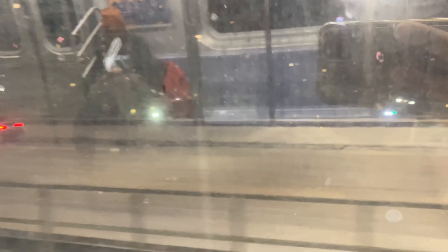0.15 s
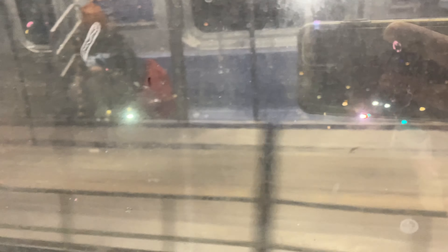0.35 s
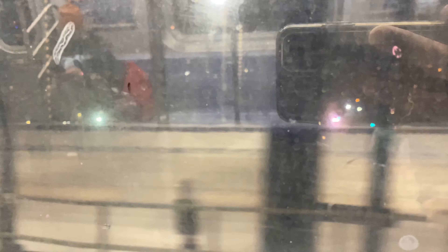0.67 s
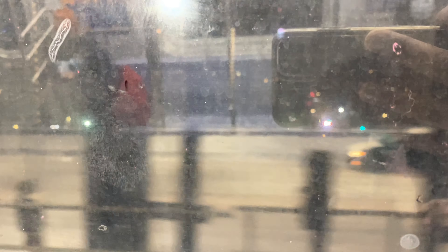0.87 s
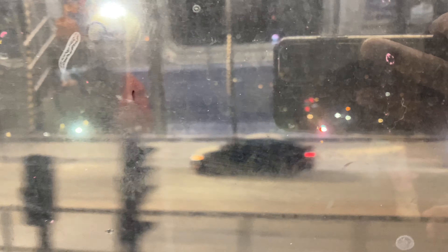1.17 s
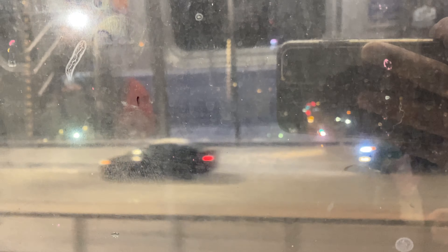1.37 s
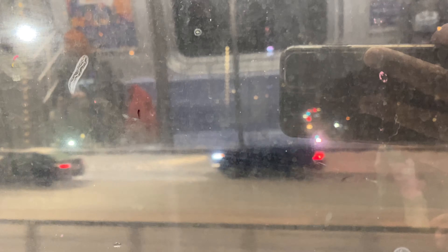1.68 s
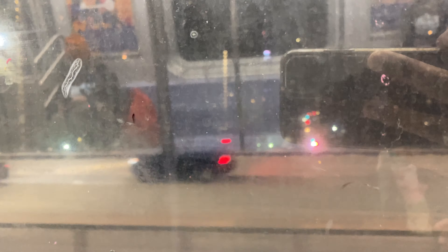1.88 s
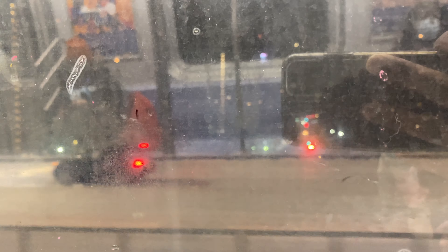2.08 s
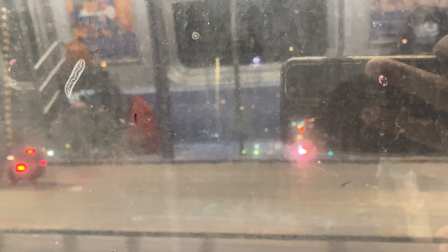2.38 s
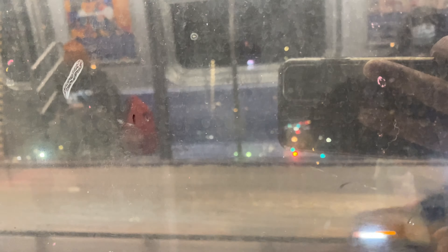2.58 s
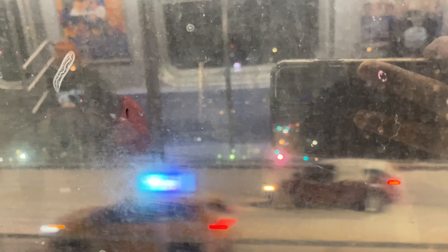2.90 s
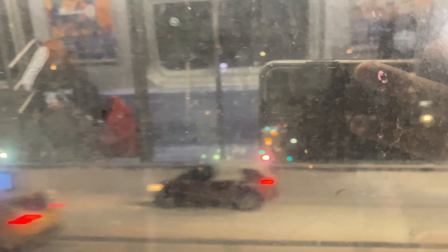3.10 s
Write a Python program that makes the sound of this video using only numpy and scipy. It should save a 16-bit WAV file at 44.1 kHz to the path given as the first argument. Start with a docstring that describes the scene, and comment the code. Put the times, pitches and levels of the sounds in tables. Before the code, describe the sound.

Train carriage rolling along steadily, deep rumble and rushing roar with wavering motor hum and faint rattles

```python
"""Inside a train carriage, close to a window: about three and a quarter seconds of steady rolling.
From the start, shaped noise gives the body rumble, wheel roar and air hiss; sines give the hum and whines.
Resonant noise booms in the cabin, and low jolts and surges over rough rail swell it from the first moments.
Soft bands of noise rustle nearby, probably clothing; from half a second on, fittings tick in ringing noise.
A panel squeaks just before one second and again past two and a half, on an unsteady sine."""
import sys
import numpy as np
from scipy import signal
from scipy.fft import rfft, irfft, next_fast_len
from scipy.io import wavfile
from scipy.ndimage import uniform_filter1d, map_coordinates

SR = 44100
rng = np.random.default_rng(int(sys.argv[2]) if len(sys.argv) > 2 else 0)


def digitize_waveform(pressure):
    """Quantize a signal to 16-bit integers and store it at the path in sys.argv[1].

    Rows of a 2-D input are taken as channels; values are limited to [-1, 1].
    """
    field = np.atleast_2d(pressure).T
    bounded = np.clip(field, -1, 1)
    quanta = np.round(bounded * 32767).astype(np.int16)
    wavfile.write(sys.argv[1], SR, quanta)


N = 143325


def amp(db):
    """Decibels to gain."""
    return 10 ** (np.asarray(db) / 20)


def unit(x):
    """Scale to rms 1."""
    return x / np.sqrt(np.mean(x ** 2) + 1e-20)


def clock():
    """The time of every sample, in seconds."""
    return np.arange(N) / SR


def curve(rows):
    """(seconds, value) points joined by straight lines."""
    return np.interp(clock(), *np.transpose(rows))


def wobble(rate):
    """A smooth random curve of rms 1 through rate knots a second."""
    knots = rng.standard_normal(4096)
    return unit(map_coordinates(knots, [clock() * rate], mode="wrap"))


def swell(s, length):
    """A bell-shaped rise and fall around time s; length is two standard deviations."""
    return np.exp(-2 * ((clock() - s) / length) ** 2)


def filtered(x, response):
    """x with its spectrum multiplied by a response of frequency in Hz."""
    m = next_fast_len(N + SR // 2)
    hz = np.fft.rfftfreq(m, 1 / SR)
    return irfft(rfft(x, m) * response(hz), m)[:N]


def rush(spectrum, patchy_db):
    """Noise of rms 1 with the given colour and patches of random gain in time and frequency."""
    z = signal.stft(rng.standard_normal(N), nperseg=512)[2]
    across_pitch = uniform_filter1d(rng.standard_normal(z.shape), size=6, axis=0)
    patches = uniform_filter1d(across_pitch, size=14, axis=1)
    noise = signal.istft(z * amp(patchy_db * unit(patches)), nperseg=512)[1][:N]
    hz, db = np.transpose(spectrum)
    return unit(filtered(noise, lambda f: amp(np.interp(np.log(f + 1), np.log(hz), db))))


def resonance(hz, width):
    """Noise of rms 1 through two equal resonators in a row, each of the given width in Hz."""
    def response(f):
        damping = 1j * f * width
        return (damping / (hz * hz - f * f + damping)) ** 2
    return unit(filtered(rng.standard_normal(N), response))


def steadied(x):
    """Noise of rms 1 with its chance swells partly evened out."""
    evenness = 0.88  # 0 = free swells, 1 = strongest levelling
    power = np.abs(uniform_filter1d(np.abs(signal.hilbert(x)) ** 2, size=SR // 25))  # 40 ms average
    return unit(x / (power + 0.054) ** (evenness / 2))


def tone(hz, wander_hz, rate):
    """A sine of rms 1 whose pitch wanders."""
    cycles = np.cumsum(hz + wander_hz * wobble(rate)) / SR
    return np.sqrt(2) * np.sin(2 * np.pi * (cycles + rng.random()))


def ventilation():
    """Moving air: a faint, smooth hiss of coloured noise."""
    # Colour of the air noise. Each row: frequency in Hz, relative density in dB per Hz.
    air_colour = [(500, -12), (3000, -21), (5000, -2), (7000, -3.5), (8700, -1), (10000, -5.5),
                  (12000, -4.5), (13200, -8.5), (15800, -9)]
    hiss = rush(air_colour, patchy_db=.3)
    return amp(-68 + 0.35 * wobble(6.9)) * hiss  # level in dB


def panel():
    """A panel rubs and squeaks on one unsteady pitch."""
    # Faint squeaks. Each row: peak time in seconds, level in dB, length in seconds.
    squeaks = [(.89, -64, 0.046), (2.645, -61.5, .028)]
    level = sum(amp(db) * swell(s, length) for s, db, length in squeaks)
    return level * tone(4200, wander_hz=110, rate=450)


def fittings():
    """Loose small parts tick: noise in a resonance, with a quick attack and exponential decay."""
    # Ticks. Each row: start in seconds, level in dB, ring in Hz, resonator width in Hz,
    # time to decay by 60 dB in seconds.
    ticks = [(.5005, -63, 10000, 7000, .015), (.5748, -55, 15300, 2500, .04),
             (0.574, -56, 8500, 4500, 0.05), (0.575, -56, 3850, 1200, 0.14),
             (2.286, -58, 12100, 1500, .022), (2.348, -64.5, 12700, 3800, .035),
             (3.09, -68, 14500, 2500, .04)]
    attack_s = 0.00062
    out = np.zeros(N)
    for s, db, hz, width, t60 in ticks:
        age = np.maximum(clock() - s, 0)
        attack = 1 - np.exp(-age / attack_s)
        out += amp(db - 60 * age / t60) * attack * resonance(hz, width)
    return out


def cloth():
    """Each rustle is a grainy band of noise that rises and falls away."""
    # Rustles nearby. Each row: start in seconds, length in seconds, level in dB, centre in Hz,
    # width (standard deviation) in octaves.
    rustles = [(.01, 0.1, -61.5, 5500, 0.79), (.2, .18, -66, 10000, 0.85), (0.37, 0.031, -66, 12000, .11),
               (.35, 0.17, -64.5, 8400, 0.6), (.65, .12, -72, 11000, .5), (1.32, 0.19, -65.5, 6500, .65),
               (1.52, 0.15, -64.5, 4000, 0.83), (1.87, 0.26, -69.5, 7000, 0.46),
               (2.725, .06, -71, 13500, .3), (2.996, .13, -68, 7500, .6), (3.193, 0.09, -65.5, 12000, .45)]
    rise, grain_db = 0.26, 2  # part of the length spent rising; depth of the grain in dB
    out = np.zeros(N)
    for s, length, db, hz, octaves in rustles:
        noise = rng.standard_normal(N)
        band = unit(filtered(noise, lambda f: np.exp(-.5 * (np.log2((f + 1) / hz) / octaves) ** 2)))
        stroke = np.interp((clock() - s) / length, [0, rise, 1], [0, 1, 0]) ** 0.38
        out += amp(db) * stroke * unit(band * amp(grain_db * wobble(400)))
    return out


def drive():
    """The motor hum, a wandering sine, swells and fades over its octave and steady electrical whines."""
    # Swells of the hum. Each row: time in seconds, level in dB before the trim and flutter.
    hum_level = [(.05, -36), (.14, -42), (.38, -47), (.55, -37.5), (.76, -42.5), (1.38, -38.5), (1.53, -56),
                 (1.91, -40), (1.98, -34), (2.09, -42), (2.16, -33), (2.24, -34), (2.38, -46),
                 (2.55, -42.5), (2.8, -36), (2.97, -34.5), (3.07, -38), (3.22, -33.5)]
    # Thin electrical whines. Each row: pitch in Hz, level in dB.
    whines = [(2744, -71), (2857, -71.5), (9000, -90), (10141, -90)]
    hum_hz, wander_hz = 288.4, 1.834
    trim_db, flutter_db, octave_db = -.5, 1.2, -55.5
    level = amp(curve(hum_level) + trim_db + flutter_db * wobble(21.5))
    hum = level * tone(hum_hz, wander_hz, rate=25)
    octave = amp(octave_db) * tone(2 * hum_hz, 2 * wander_hz, rate=12)
    whine = sum(amp(db) * tone(hz, wander_hz=1.8, rate=15) for hz, db in whines)
    return hum + octave + whine


def rumble():
    """The car body shakes evenly, with a low surge at each jolt of the track."""
    # Colour of the body rumble. Each row: frequency in Hz, relative density in dB per Hz.
    body_colour = [(8, -29), (24, -13), (39, -1), (54, -3.5), (70, -7.5), (88, -7.5), (106, -15.5),
                   (200, -42), (500, -75), (1500, -120)]
    # Jolts on the track. Each row: peak time in seconds, level in dB, length in seconds.
    jolts = [(0.11, -32, 0.069), (0.816, -42, 0.019), (0.948, -28.5, .045), (1.23, -48, 0.033),
             (1.677, -29.5, 0.057), (1.974, -28.5, 0.09), (2.553, -36, 0.1), (3.05, -32, 0.07)]
    # Colour of a jolt. Each row: frequency in Hz, relative density in dB per Hz.
    jolt_colour = [(14, -38), (30, -7), (52, -4), (66, -9), (90, -23), (130, -25), (400, -84)]
    surge = sum(amp(db) * swell(s, length) for s, db, length in jolts)
    steady = amp(-35) * steadied(rush(body_colour, patchy_db=2.5))
    return steady + surge * steadied(rush(jolt_colour, patchy_db=-1.5))


def wheels():
    """The roar of wheel on rail flutters a little, swells on rough rail and sets the cabin booming."""
    # Rolling noise heard through the shell. Each row: frequency in Hz, relative density in dB per Hz.
    rolling_colour = [(40, -28), (105, -3.5), (150, -0.5), (200, -2.5), (350, -1.5), (410, -6), (480, -7.5),
                      (540, -9.5), (680, -12), (830, -13), (1120, -13.5), (1230, -18), (1600, -19),
                      (1900, -19.5), (2200, -23.5), (2500, -28.5), (3500, -36.5), (5000, -43.5),
                      (9000, -54), (16000, -70)]
    # Course of the roar. Each row: time in seconds, level in dB before the trim and flutter.
    rolling_level = [(0.06, -34.5), (0.12, -35), (0.32, -35.5), (0.33, -34.5), (0.35, -35.5), (1.34, -35),
                     (1.39, -35), (1.41, -35), (1.72, -35.5), (3.25, -35)]
    # Booming modes of the cabin. Each row: pitch in Hz, half the resonator width in Hz, level in dB.
    cabin_modes = [(133.2, 8.4, -41), (182.5, 15, -48), (222.7, 9.9, -44), (253.4, 5, -41),
                   (332, 16.7, -48.5), (461, 22, -48.5), (583, 13.6, -50)]
    # Brief booms as the wheels cross rough rail. Each row: peak time in seconds, level in dB,
    # length in seconds, centre in Hz, resonator width in Hz.
    rough_rail = [(0.096, -28.5, .05, 86, 45), (0.279, -34.5, 0.044, 220, 122),
                  (0.295, -37, 0.051, 410, 293), (0.418, -31, 0.028, 180, 45), (0.644, -30.5, 0.07, 90, 50),
                  (0.674, -35.5, 0.06, 250, 160), (1.387, -28.5, 0.049, 88, 70),
                  (1.39, -34, 0.021, 392, 150), (1.608, -40.5, .04, 1030, 300), (1.97, -36, .04, 240, 70),
                  (2.088, -30.5, 0.025, 244, 50), (2.193, -32.5, 0.094, 207, 90),
                  (2.51, -35, 0.07, 126, 35), (2.97, -35, 0.045, 315, 221)]
    trim_db, flutter_db = 2.5, 0.34
    level = amp(curve(rolling_level) + trim_db + flutter_db * wobble(45.14))
    roar = level * rush(rolling_colour, patchy_db=0.43)
    booms = sum(amp(db) * steadied(resonance(hz, 2 * half_width)) for hz, half_width, db in cabin_modes)
    surges = sum(amp(db) * swell(s, length) * steadied(resonance(hz, width))
                 for s, db, length, hz, width in rough_rail)
    return roar + booms + surges


def scene():
    """Everything heard at the window seat."""
    return (rumble() + wheels() + drive() + ventilation() + cloth() + fittings() + panel())[None]


def record(dry):
    """The microphone opens just after the start, closes at the end and keeps nothing above its band limit."""
    start_s, fade_s, top_hz = .035, .003, 15750
    t = clock()
    opening = np.clip(np.minimum(t - start_s, t[-1] - t) / fade_s, 0, 1)
    return filtered(dry[0] * opening, lambda f: f < top_hz)[None]


dry = scene()
out = record(dry)
digitize_waveform(out)
```